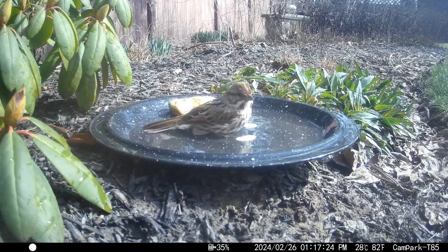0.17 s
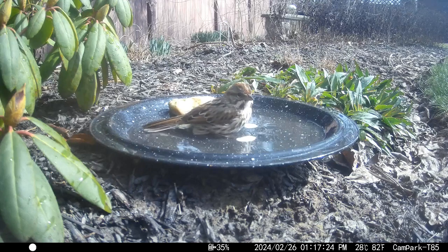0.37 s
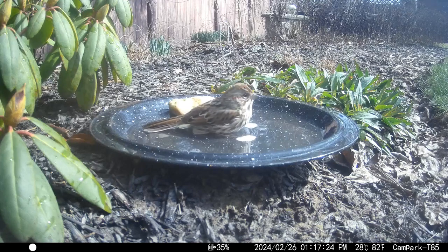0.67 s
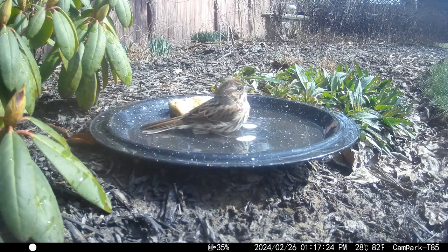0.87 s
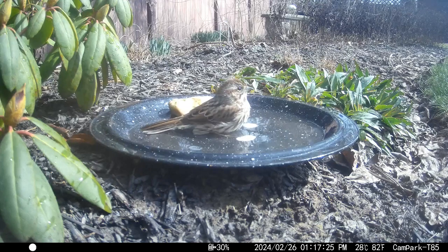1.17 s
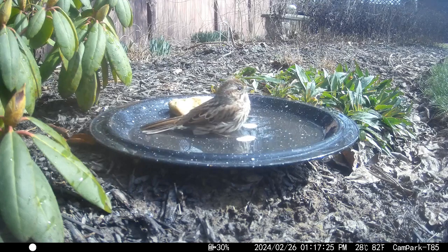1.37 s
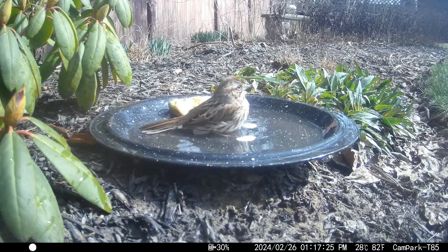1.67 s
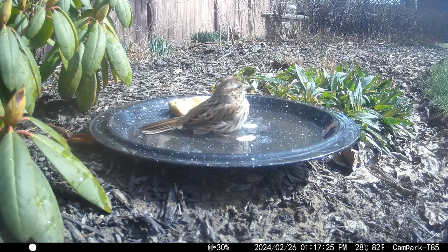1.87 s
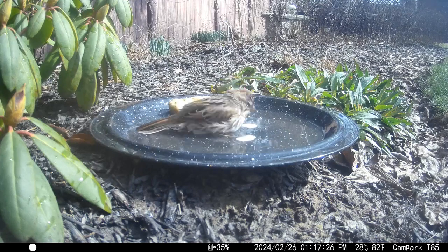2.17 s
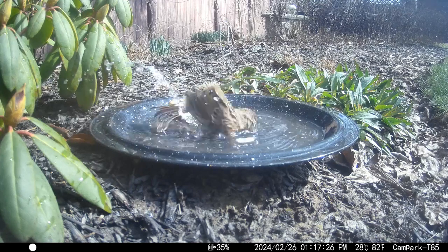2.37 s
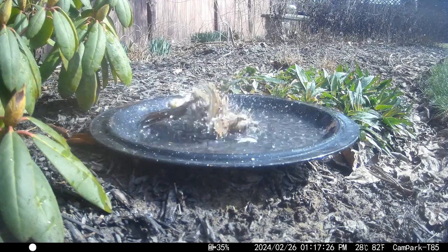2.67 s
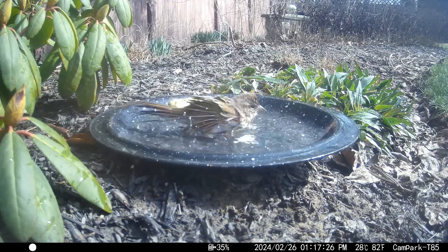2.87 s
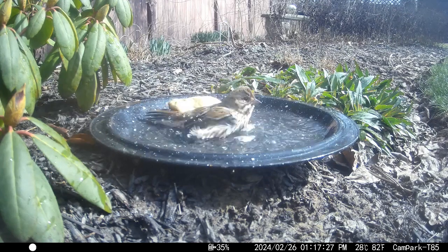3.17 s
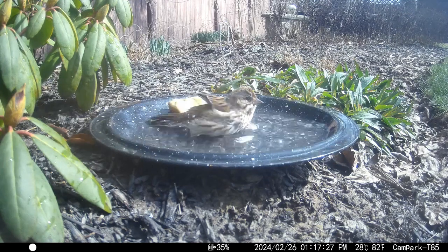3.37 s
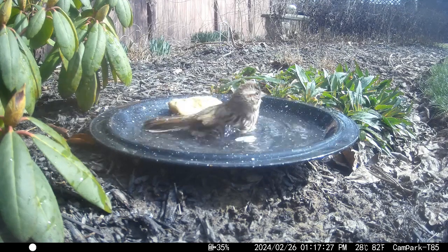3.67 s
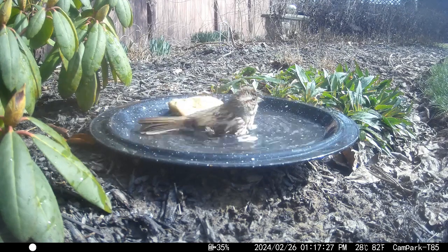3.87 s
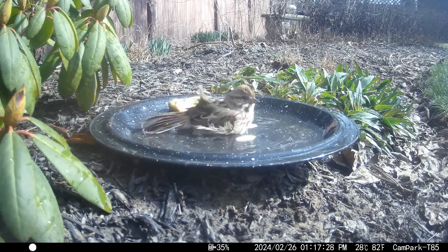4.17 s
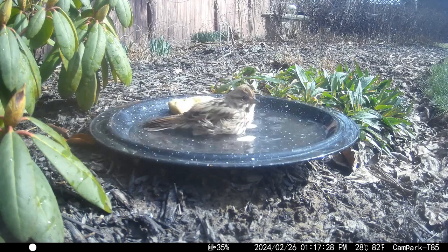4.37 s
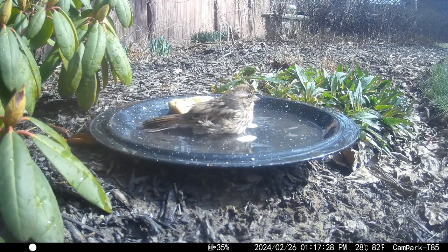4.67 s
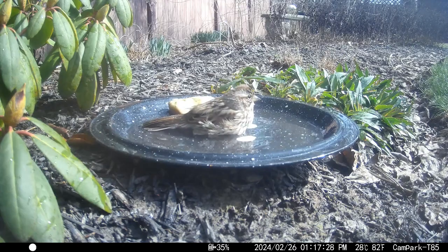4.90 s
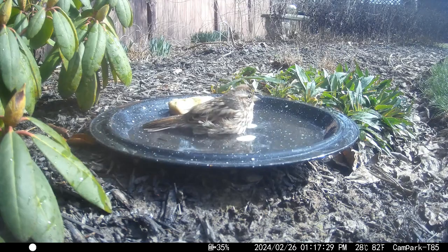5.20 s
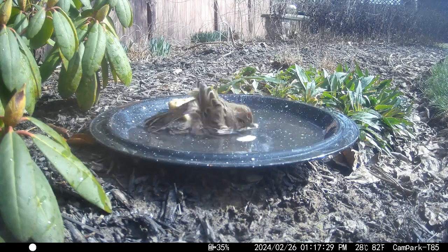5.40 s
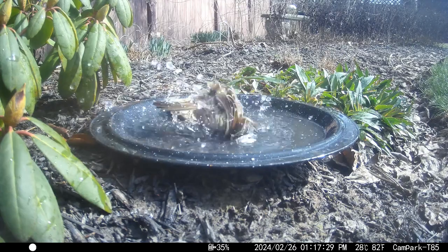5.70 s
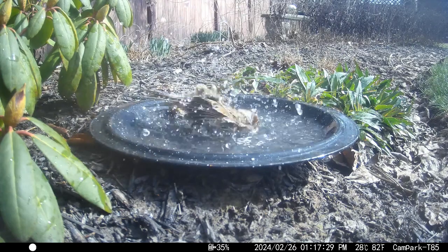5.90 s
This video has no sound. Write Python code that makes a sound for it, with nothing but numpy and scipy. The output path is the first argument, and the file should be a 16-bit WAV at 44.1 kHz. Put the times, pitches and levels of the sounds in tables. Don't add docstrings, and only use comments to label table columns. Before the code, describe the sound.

In a quiet yard with low uneven traffic rumble and soft hiss, a bird gives one short hoarse chirp. It then plunges into a shallow dish, wings slapping the water and knocking the rim, followed by fast wet feather flutters with a second chirp. After a snap and a lull, a distant bird whistles faintly, then a second splashing plunge ends the sound. A small, slightly dull microphone sits a step away.

```python
import sys
import numpy as np
from scipy import signal
from scipy.fft import rfft, irfft
from scipy.io import wavfile
from scipy.ndimage import uniform_filter1d

SR = 44100
rng = np.random.default_rng(int(sys.argv[2]) if len(sys.argv) > 2 else 0)


def store_wav(level_fs):
    pcm = np.round(np.clip(np.atleast_2d(level_fs), -1, 1) * 32767)
    wavfile.write(sys.argv[1], SR, pcm.T.astype(np.int16))


def amplitude_ratio(level_db):
    exponent = np.asarray(level_db, float) / 20
    return 10 ** exponent


N = 266452


def evened(x):
    return x / np.sqrt(np.mean(x ** 2) + 1e-20)


def curve(rows, axis):
    rows = np.asarray(rows)
    return amplitude_ratio(np.interp(np.arange(N) / SR, rows[:, 0], rows[:, axis], left=-200, right=-200))


def coloured(x, points):
    hz, db = np.transpose(points)
    log_f = np.log(np.fft.rfftfreq(len(x), 1 / SR) + 1)
    gain = amplitude_ratio(np.interp(log_f, np.log(hz + 1), db, left=-90, right=-90))
    return evened(irfft(rfft(x) * gain, len(x)))


def add(mix, s, sound):
    part = mix[round(s * SR):][:len(sound)]
    part += sound[:len(part)]


def rung(modes, t):
    return sum(amplitude_ratio(db - 60 * t / t60) * np.sin(2 * np.pi * hz * t) for hz, db, t60 in modes)


def below(x, edge_hz):
    return signal.oaconvolve(x, signal.firwin(511, edge_hz, window=("kaiser", 9), fs=SR)[None], "same")


# [t/s, level/dB]
TRAFFIC_SWELL = [(0.0, -65), (0.07, -53.5), (0.54, -55), (0.57, -71), (0.62, -51.5), (1.14, -50.5),
                 (1.33, -56.5), (1.38, -48.5), (1.56, -65), (1.63, -51), (1.66, -58), (1.97, -50),
                 (2.4, -58.5), (2.71, -48), (2.74, -56.5), (3.01, -52.5), (5.62, -55), (6.04, -53)]
# [f/Hz, level/dB per Hz]
HUM_COLOUR = [(12, -47), (20, -11), (48, -11.5), (81, -0.5), (101, 1), (119, -24.5), (140, -10.5),
              (180, -44), (310, -120)]
DRONE_COLOUR = [(65, -33.5), (110, -3.5), (118, -3), (151, 0), (248, -7), (287, -10), (340, -13),
                (533, -22), (2000, -38.5), (2600, -69), (4400, -120)]
HISS_COLOUR = [(530, -15), (900, -3.5), (1420, -3.5), (1540, -3.5), (4960, -5.5), (7620, -4), (12100, -5.5),
               (13300, -5.5), (15600, -8.5)]
# [t/s, rise/dB, length/s]
GUSTS = [
    (3.87, 7.5, 0.08),
    (5.7, 4, 0.078),
    (5.95, 5, 0.14),
    (3.2, 2, 0.23),
    (4.25, 0.5, 0.056),
]


def yard():
    hum_noise, drone_noise, hiss_noise = rng.standard_normal((3, N))
    t = np.arange(N) / SR
    road = curve(TRAFFIC_SWELL, axis=1)
    hum = coloured(hum_noise, HUM_COLOUR)
    hum /= np.sqrt(uniform_filter1d(hum ** 2, size=5000)) + 0.34
    gusts_db = sum(db * np.exp(-((t - s) / length) ** 2) for s, db, length in GUSTS)
    rise_db = 0.16 * t
    drone_swell = evened(road ** 0.021)
    drone = amplitude_ratio(-56.5) * drone_swell * amplitude_ratio(rise_db + gusts_db) * coloured(drone_noise, DRONE_COLOUR)
    return amplitude_ratio(3.5) * hum * road + drone + amplitude_ratio(-66.5) * coloured(hiss_noise, HISS_COLOUR)


# [t/s, partial, level/dB, length/s]
CATCHES = [
    [(1.4615, 1, -16, .0012), (1.469, 1, -9, .001), (1.476, 1, -12, .0012), (1.4565, 2, -11, .002)],
    [(3.8735, 1, -18, .0015), (3.879, 2, -4, .0015)],
]


def voiced(rows, third_db, fourth_db, fourth_width, half_db, half_at, catches):
    s, hz, effort = np.transpose(rows)
    t = np.linspace(s[0], s[-1], num=120)
    gone = (t - s[0]) / (s[-1] - s[0])
    effort = np.interp(t, s, effort)
    bloom = 7.5 * np.exp(-((gone - 0.54) / 0.26) ** 2)
    first = -51.5 + 0.49 * (effort + 43.5) + bloom
    half = effort + half_db - 10 * ((gone - half_at) / 0.15) ** 2
    third = effort + third_db - 22 * gone
    fourth_shape = np.maximum(-10 * ((gone - 0.22) / fourth_width) ** 2, -13 * (1 + gone))
    fourth = effort + fourth_db + fourth_shape
    caught = [sum(db * np.exp(-((t - at) / length) ** 2) for at, k, db, length in catches if k == partial)
              for partial in (1, 2)]
    levels = [first + caught[0], effort + caught[1], half, third, fourth]
    return np.transpose([t, np.interp(t, s, hz), *levels])


def sung(rows, multiples, flutter_hz, depth, rough):
    s, hz, *levels = np.transpose(rows)
    t = np.arange(s[0], s[-1], 1 / SR)
    turns = np.cumsum(uniform_filter1d(np.interp(t, s, hz), size=200)) / SR
    gone = (t - s[0]) / (s[-1] - s[0])
    late = np.sin(np.pi * gone ** 2.0) ** 2
    noise = rng.standard_normal((len(multiples), 2, len(t)))
    wander = evened(uniform_filter1d(uniform_filter1d(noise, size=80), size=80))
    hoarse = wander * rough * (0.4 + late)
    beat = 1 + late * depth * np.cos(2 * np.pi * flutter_hz * (t - s[0]))
    tone = 0
    for (k, column, db), (swing, slip) in zip(multiples, hoarse):
        level = amplitude_ratio(np.interp(t, s, levels[column]) + db)
        tone = tone + level * (1 + swing) * np.sin(2 * np.pi * k * turns + slip)
    return s[0], np.sqrt(2) * tone * beat * signal.windows.tukey(len(t), 0.1)


# [t/s, f/Hz, effort/dB]
CHIRPS = [
    [(1.427, 1360, -84), (1.434, 1435, -59), (1.441, 1730, -48.5), (1.449, 1785, -45), (1.462, 1910, -42),
     (1.47, 1810, -42.5), (1.48, 1650, -47), (1.491, 1330, -72)],
    [(3.849, 1230, -80), (3.855, 1440, -55), (3.862, 1786, -40), (3.87, 1810, -42.5), (3.875, 1957, -41),
     (3.887, 1807, -43.5), (3.896, 1740, -43), (3.901, 1700, -63)],
]
# [t/s, f/Hz, level/dB]
STRAY_VOICES = [
    [(1.462, 3300, -66), (1.466, 3050, -50), (1.471, 2900, -55), (1.478, 2500, -63), (1.485, 2200, -71)],
    [(3.874, 3450, -64), (3.879, 3380, -49), (3.883, 3170, -52), (3.888, 3020, -57), (3.893, 2850, -68)],
]
# [t/s, f/Hz, level/dB]
UPPER_THROAT = [(4.708, 2950, -71), (4.72, 3600, -61), (4.736, 3800, -62), (4.744, 4300, -62),
                (4.75, 4950, -66), (4.757, 5200, -66), (4.765, 4900, -67), (4.773, 4620, -61),
                (4.784, 4500, -72)]
LOWER_THROAT = [(4.68, 3200, -76), (4.703, 2780, -70), (4.72, 2980, -64), (4.733, 3300, -61),
                (4.742, 3800, -59), (4.75, 3980, -57), (4.757, 4700, -59), (4.764, 3900, -65),
                (4.776, 3150, -73)]


def birds():
    out = np.zeros(N)
    whole = [(1, 0, 0), (2, 1, 0), (3, 3, 0), (4, 4, 0)]
    halves = [(3 / 2, 2, 0), (1 / 2, 2, -17), (5 / 2, 2, -17), (7 / 2, 2, -21)]
    first = voiced(CHIRPS[0], third_db=-18, fourth_db=-11, fourth_width=0.055,
                   half_db=-5.5, half_at=0.47, catches=CATCHES[0])
    second = voiced(CHIRPS[1], third_db=-13, fourth_db=-18, fourth_width=0.22,
                    half_db=-9.5, half_at=0.5, catches=CATCHES[1])
    add(out, *sung(first, whole + halves, flutter_hz=243, depth=0.5, rough=0.21))
    add(out, *sung(second, whole + halves, flutter_hz=235, depth=0.25, rough=0.14))
    for voice in STRAY_VOICES:
        add(out, *sung(voice, whole[:1], flutter_hz=200, depth=0.6, rough=0.6))
    for voice in (UPPER_THROAT, LOWER_THROAT):
        add(out, *sung(voice, whole[:1], flutter_hz=110, depth=0.3, rough=0.2))
    t = np.arange(6000) / SR
    tail = rng.standard_normal(6000) * amplitude_ratio(-60 * t / 0.06) * (t > 0.004)
    return out + amplitude_ratio(-22) * signal.fftconvolve(out, tail / np.linalg.norm(tail))[:N]


# [t/s, level/dB, length/s]
RUSTLES = [
    (1.498, -65.5, 0.059),
    (2.0, -68.5, 0.033),
    (2.44, -78, 0.055),
    (3.228, -52, 0.0064),
    (4.293, -64.5, 0.039),
    (4.765, -66, 0.062),
    (5.233, -67, .04),
]
# [f/Hz, level/dB per Hz]
RUSTLE_COLOUR = [(250, -25), (450, 1), (800, 0), (1400, -8), (2500, -14)]
# [t/s, peak/dB]
SNAPS = [
    (4.1875, -33),
    (4.1932, -44),
    (3.9705, -46),
    (2.6695, -35),
    (5.8562, -48),
    (5.7995, -42),
]
# [f/Hz, level/dB, t60/s]
SNAP_MODES = [(1300, -14, .004), (2350, 9, 0.0063), (3100, 6, 0.005), (4430, 10, 0.0058), (5560, 2, 0.008),
              (6900, -17, .003), (8000, 1, 0.0055), (11700, -4, .003)]


def small_noises():
    out, t = np.zeros(N), np.arange(N) / SR
    snap = rung(SNAP_MODES, t[:500])
    for s, db in SNAPS:
        add(out, s, amplitude_ratio(db) * snap / abs(snap).max())
    swell = sum(amplitude_ratio(db) * np.exp(-((t - s) / length) ** 2) for s, db, length in RUSTLES)
    return out + swell * coloured(rng.standard_normal(N), RUSTLE_COLOUR)


def drops(per_s, spread_db):
    size = amplitude_ratio(spread_db * np.minimum(rng.exponential(1, N), 4))
    return rng.standard_normal(N) * size * (rng.random(N) < per_s / SR)


def bout(start, height, end, db, swell_db):
    return curve([(start, db - swell_db), (height, db), (end, db - swell_db)], axis=1)


# [start t/s, height t/s, end t/s, slosh level/dB, fizz level/dB]
SPRAY_BOUTS = [
    (2.3, 2.7, 3, -62, -69),
    (2.946, 3.178, 3.52, -64, -72),
    (3.546, 3.812, 4.05, -62.5, -69),
    (5.55, 5.848, 6.64, -61.5, -69.5),
]
# [f/Hz, level/dB per Hz]
SLOSH_COLOUR = [(180, -21), (300, -9), (346, -26), (538, -13), (638, -4), (746, -11.5), (1650, -14.5),
                (1990, -15.5), (9000, -26), (11700, -34), (19800, -120)]


def spray():
    t = np.arange(300) / SR
    slosh = coloured(drops(9000, spread_db=2.5), SLOSH_COLOUR)
    fizz = np.zeros(N)
    for hz in np.geomspace(4500, 13500, 16):
        bubble = np.sin(2 * np.pi * hz * t) * np.exp(-t * hz / 14)
        fizz += signal.oaconvolve(drops(350, spread_db=3.5), bubble)[:N] * hz ** 1.1
    fizz = evened(fizz)
    out = np.zeros(N)
    for *when, slosh_db, fizz_db in SPRAY_BOUTS:
        out += slosh * bout(*when, slosh_db, swell_db=12.5)
        out += fizz * bout(*when, fizz_db, swell_db=9)
    return out


# [t/s, peak/dB, f/Hz,
# life/s, glide/per s]
BUBBLES = [(2.399, -60.5, 3230, 0.036, 0), (2.564, -50, 9600, .006, 1), (2.7342, -48, 4800, .007, 0),
           (2.735, -55, 5900, .005, 1), (2.6713, -33, 1300, .009, 5), (2.7686, -53, 4040, 0.011, 17),
           (2.7898, -44.5, 3160, 0.012, 3.5), (2.794, -52, 2700, .008, 2), (2.811, -52, 8900, .006, 1.),
           (3.809, -54, 3100, .008, 1.), (3.919, -55, 6900, .007, 1.), (3.9185, -44, 1060, .006, 1.),
           (5.693, -57, 6600, 0.0099, -2), (5.976, -50, 6160, .006, 1.), (5.862, -44, 1110, .009, 1.),
           (3.8095, -48, 7200, .003, 1.), (3.8095, -52, 5200, .003, 1.), (3.822, -51, 5800, .0028, 1.),
           (3.608, -47, 2900, .0035, 1.), (3.6945, -48, 3280, .005, 1.), (3.742, -51, 3500, .004, 1.),
           (3.786, -54, 3500, .005, 1.), (5.6, -63, 3700, 0.026, .1), (5.755, -57, 4000, .015, 3.),
           (5.776, -56, 3810, .02, 2), (5.778, -51, 12500, .01, 1.), (5.803, -57, 5500, 0.04, 1),
           (5.985, -47.5, 2400, 0.015, 2.), (6.0147, -29.5, 2490, 0.009, -5), (6.02, -51, 2250, .014, 1.),
           (6.0255, -46, 2150, 0.013, 30.)]


def bubbles():
    out, t = np.zeros(N), np.arange(2500) / SR
    for s, db, hz, life, glide in BUBBLES:
        shape = amplitude_ratio(db - 60 * (t / life) ** 2) * (1 - np.exp(-t / 0.00025))
        add(out, s, shape * np.sin(2 * np.pi * hz * t * (1 + glide * t)))
    return out


# [f/Hz, level/dB per Hz]
PLOP_COLOUR = [(1200, -2), (2100, 0), (3200, 4), (3900, 2), (4800, -35), (7000, -14)]
SPIT_COLOUR = [(3000, -12), (5000, 6), (7000, 0.5), (10000, 4), (13000, -0.5), (15000, -2), (16000, -26)]


def slaps(rows, thud, rise_s, thud_s, plop_s, spit_s, blotch_db):
    out, t = np.zeros(N), np.arange(-300, 700) / SR
    noise = rng.standard_normal((len(rows), 3, len(t)))
    sizes = rng.standard_normal((len(rows), len(SPIT_COLOUR)))
    for (s, thud_db, plop_db, spit_db, tilt_db), puffs, size in zip(rows, noise, sizes):
        spit = [(hz, db + blotch_db * u + tilt_db * np.log2(hz / 8000))
                for (hz, db), u in zip(SPIT_COLOUR, size)]
        colours = (thud, PLOP_COLOUR, spit)
        levels, falls = (0, plop_db, spit_db + 0.5), (thud_s, plop_s, spit_s)
        for puff, colour, db, fall_s in zip(puffs, colours, levels, falls):
            shape = np.exp(np.where(t < 0, t / rise_s, -t / fall_s))
            puff = coloured(puff, colour) * shape
            puff *= np.linalg.norm(shape) / np.linalg.norm(puff)
            add(out, s + t[0], amplitude_ratio(thud_db + db - 2.5) * puff)
    return out


# [t/s, thud
# level/dB, plop over thud/dB, spit over thud/dB]
PLUNGE_STROKES = [(2.4023, -53, -4, -3), (2.4671, -61.5, 3, 2), (2.5249, -56, -4, -8), (2.5346, -53, -1, 1),
                  (2.5576, -46, -2.5, -20), (2.589, -47, -2, -2), (2.6183, -44, -9, -12),
                  (2.632, -43.5, -12, -20), (2.648, -49, -1, -1), (2.6712, -36, -11, -12),
                  (2.6839, -36.5, -16, -25), (2.6959, -47.5, -3, 2), (2.7355, -54.5, 0, 5),
                  (2.748, -51.5, -3, -4), (2.791, -45, -1.5, -3), (2.8627, -54.5, -5, -3),
                  (5.5803, -56, -15, -12), (5.6512, -65, 5, 8), (5.6927, -50, 2.5, -12),
                 (5.7192, -49.5, -6, -9), (5.75, -53, -4, -7), (5.7793, -47.5, -8, -1.5),
                 (5.7998, -45.5, -0.5, -7), (5.8353, -56, 0, 1), (5.8575, -41.5, -5, -16),
                 (5.8656, -40, -13, -25), (5.8824, -51, -9, -18), (5.8907, -48, -5, -3),
                 (5.9329, -48, -7, 0.5), (5.944, -57, -1, 1), (5.9695, -46.5, -5, -14),
                 (5.9756, -55, -6, 0), (5.9884, -46.5, -3, -4.5), (6.0163, -51, -1, -18)]
THROW_TILT = [2, 2, .3, 2, 4, .3, -8, .3, 4, -13, .3, 2, -6, .3, -3, 7, .3, 2, .3, .3, .3, 0, -6, 2, -3, .3,
              .3, 3, 5, 2, .3, -2, 6, .3]
# [f/Hz, level/dB per Hz]
WET_THUD_COLOUR = [(380, -35), (600, -1.5), (1000, 5), (1500, 3), (2100, -20), (3500, -23)]


def splashes():
    strokes = PLUNGE_STROKES
    fall_s, spread_db = 0.007, 0.5
    chance = rng.standard_normal((len(strokes), 4))
    rows = []
    for (s, db, plop, spit), (a, b, c, d), tilt in zip(strokes, chance, THROW_TILT):
        first_fall = s + fall_s * (1 + 0.15 * a)
        second_fall = s + fall_s * (2.4 + 0.33 * c)
        rows += [(s, db, plop, spit, tilt),
                 (first_fall, db - 2.5 + spread_db * b, plop - 3, spit - 3, tilt),
                 (second_fall, db - 14 + spread_db * d, plop + 2.8, spit + 3, tilt)]
    return slaps(rows, WET_THUD_COLOUR, rise_s=0.0005, thud_s=0.0026, plop_s=0.0054, spit_s=0.0039, blotch_db=5.5)


# [t/s, blow level/dB, crack over blow/dB, hardness/dB per octave]
KNOCKS = [
    (2.553, -41, -27, -6),
    (2.617, -37, -16, -4),
    (2.631, -51, -25, -10),
    (2.645, -51, -12, -5),
    (2.67, -30.5, -19, 0),
    (2.689, -42, -14, -7),
    (5.691, -46.5, -20, -4.5),
    (5.8, -41.5, -22, -2),
    (5.856, -34, -15.5, -7),
    (5.931, -47, -27, -3),
]
# [f/Hz, level/dB, t60/s]
DISH_MODES = [(651, -4, 0.1), (919, -2, 0.1), (1138, -8, 0.1), (1260, -11, 0.15), (1434, -11, 0.07),
              (1527, -4.5, 0.1), (1700, -6, 0.1), (2490, -15, 0.034), (3160, -3.5, 0.031),
              (5300, -18, 0.025), (5500, -2.5, 0.039), (6500, -6, 0.028)]


def dish():
    out, t = np.zeros(N), np.arange(8000) / SR
    noises = rng.standard_normal((len(KNOCKS), 2, len(t)))
    spots = rng.standard_normal((len(KNOCKS), len(DISH_MODES)))
    for (s, blow_db, crack_db, hard_db), (noise, water), spot in zip(KNOCKS, noises, spots):
        modes = [(hz, db + hard_db * max(np.log2(hz / 2000), 0) + 1.1 * u, t60)
                 for (hz, db, t60), u in zip(DISH_MODES, spot)]
        ring = rung(modes, t)
        ragged = signal.fftconvolve(ring, noise * np.exp(-t / 0.0015))[:len(t)]
        sound = ring + 0.17 * ragged
        sound /= abs(sound).max()
        sound += amplitude_ratio(crack_db + 6.5) * coloured(noise, SPIT_COLOUR) * np.exp(-t / 0.0036)
        sound += amplitude_ratio(-18 - 60 * t / 0.15) * coloured(water, SLOSH_COLOUR[2:])
        add(out, s, amplitude_ratio(blow_db) * sound)
    return out


# [f/Hz, level/dB per Hz]
THUD_COLOUR = [(150, -25), (400, -5), (900, 4), (1400, -0.5), (2200, -19), (3500, -12)]
# [t/s, thud level/dB, plop over thud/dB, spit over thud/dB, tilt/dB per octave]
DRIPS = [(3.966, -62, 3, 8, -6), (3.995, -67, 3, 11, -8), (4.006, -67, 5, 2, -5), (4.052, -67, 4, 1, -4),
         (4.057, -65, 5, 1, -4), (4.09, -68, 4, 9, -5), (4.128, -70, 1, 10, -6), (3.133, -50, -9, -14, .3),
         (5.851, -66, 6, 15, -6), (2.6985, -66, 1, 14, 3), (2.733, -68, 1, 16, 6), (2.799, -68, 1, 14, 5),
         (2.87, -70, 1, 12, 8), (2.879, -70, 1, 11, 6), (5.681, -65, 1, 12, .3), (5.775, -66, 1, 13, 5),
         (5.897, -68, 1, 13, 5), (5.996, -71, 1, 11, 7)]


def drips():
    return slaps(DRIPS, THUD_COLOUR, rise_s=0.001, thud_s=0.0017, plop_s=0.0017, spit_s=0.0016, blotch_db=6.0)


# [t/s, thud level/dB, plop over thud/dB, spit over thud/dB]
FLUTTER = [(2.9543, -57, 2.5, 0), (3.0083, -57, 0, -1), (3.049, -46, -8, -7), (3.0995, -42.5, -1, -6),
           (3.1412, -41.5, -1.5, -7), (3.1843, -40.5, -19, -9.5), (3.2276, -44.5, 4, -6),
           (3.2704, -50.5, -2.5, -11), (3.322, -40.5, -0.5, -7), (3.3767, -49, -5.5, -3),
           (3.602, -39.5, -13, -13), (3.652, -52.5, -12, -11), (3.6939, -45, -7, -5.5),
           (3.7368, -43, -12, -10), (3.7609, -61, -4, 8), (3.781, -43, -9, -10), (3.8282, -45.5, -4, -7),
           (3.8713, -42, 0, -6), (3.9187, -39.5, -20, -13), (3.97, -47, 3, -1)]
OTHER_WING_LAG = [-8, 15, 8.5, -6.5, -4, -5.5, -1, 7, -2, -5, 6, -4, -3, 5, -6, -3, 6, 4, 5, 7]
OTHER_WING_LEVEL = [0, -2, -2, 1, -0.5, -3, -4, -2, -2, 0, -3.5, 2, -6, -3.5, -2, -6, -3, -0.5, -7, -7]
SHAKE_TILT = [.3, .3, -1, .3, .3, .3, -1, .3, .3, .3, .3, .3, 0.41, .3, .3, .3, 0.27, .3, 0.41, -1.1]


def wing_beats():
    rows = []
    for (s, db, plop, spit), lag_ms, other_db, tilt in zip(FLUTTER, OTHER_WING_LAG, OTHER_WING_LEVEL, SHAKE_TILT):
        lag = lag_ms / 1000
        wind_up = s + min(lag, 0) - 0.007
        rows += [(s, db, plop, spit, tilt),
                 (s + lag, db + other_db, plop - 1, spit - 1, tilt),
                 (wind_up, db - 13, plop - 10, spit - 10, tilt)]
    return slaps(rows, THUD_COLOUR, rise_s=0.001, thud_s=0.0024, plop_s=0.0013, spit_s=0.0018, blotch_db=0.5)


def scene():
    water = spray() + bubbles() + splashes() + drips()
    bather = dish() + wing_beats()
    return (yard() + birds() + small_noises() + water + bather)[None]


def top_cut(x):
    return signal.sosfilt(signal.butter(12, 15730, fs=SR, output="sos"), x)


# [start t/s, end t/s]
DULL_SPELLS = [
    (2.656, 2.681),
    (3.071, 3.097),
    (3.199, 3.322),
    (3.839, 3.865),
    (5.855, 5.882),
    (6.016, 6.1),
]


def record(dry):
    t = np.arange(N) / SR
    spells = sum((t > start) * (t < end) * 1.0 for start, end in DULL_SPELLS)
    dullness = 0.995 * uniform_filter1d(spells, size=90)
    dulled = dry + dullness * (below(dry, 8800) - dry)
    limited = below(dulled, 15750)
    return top_cut(limited)


dry = scene()
out = record(dry)
store_wav(out)
```